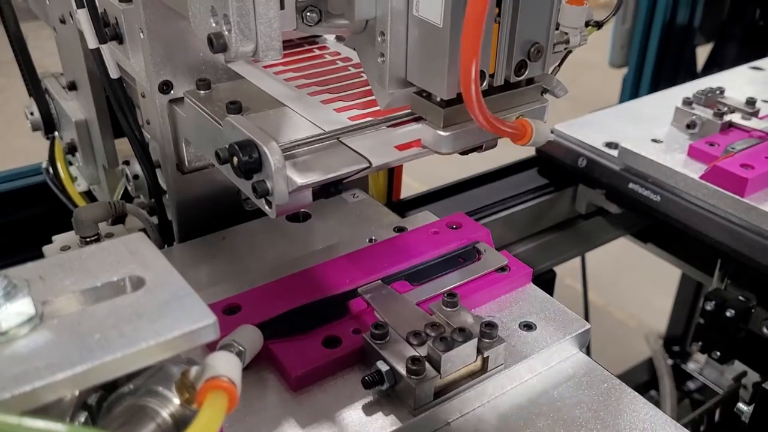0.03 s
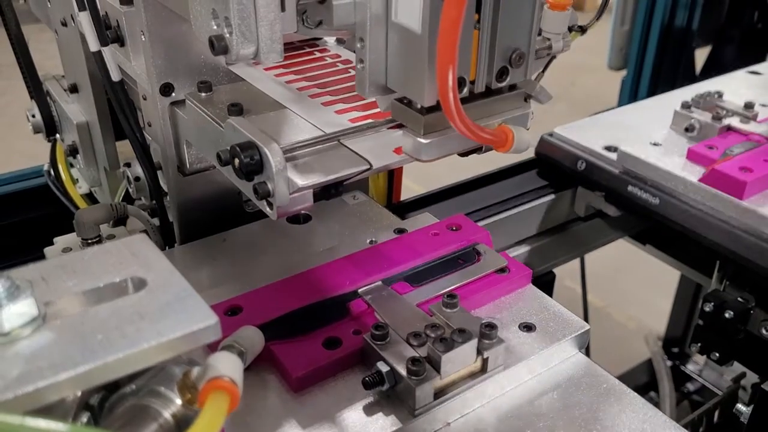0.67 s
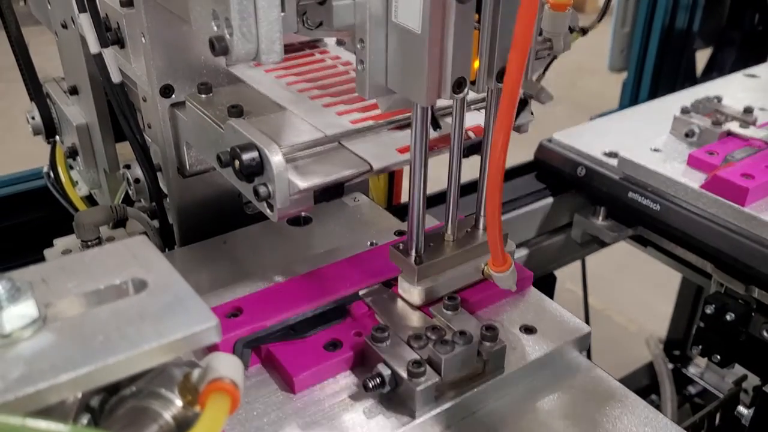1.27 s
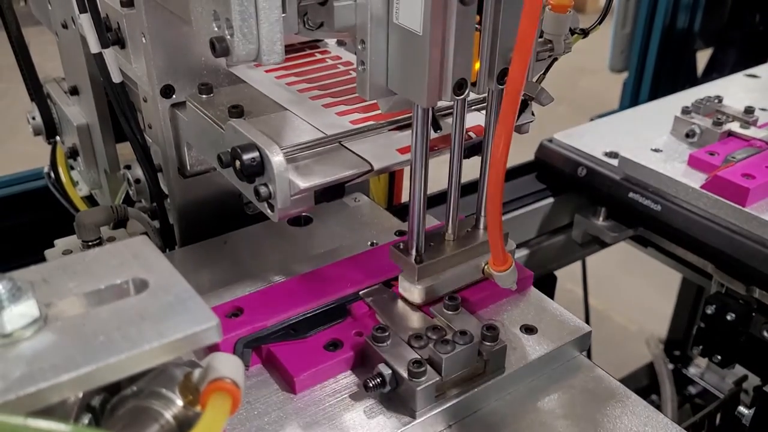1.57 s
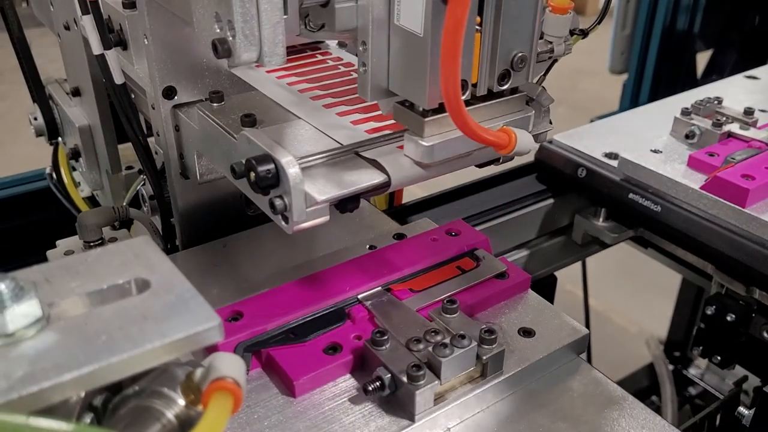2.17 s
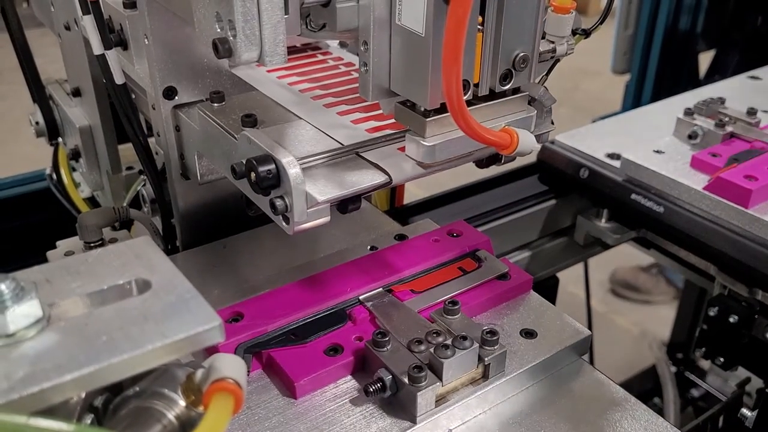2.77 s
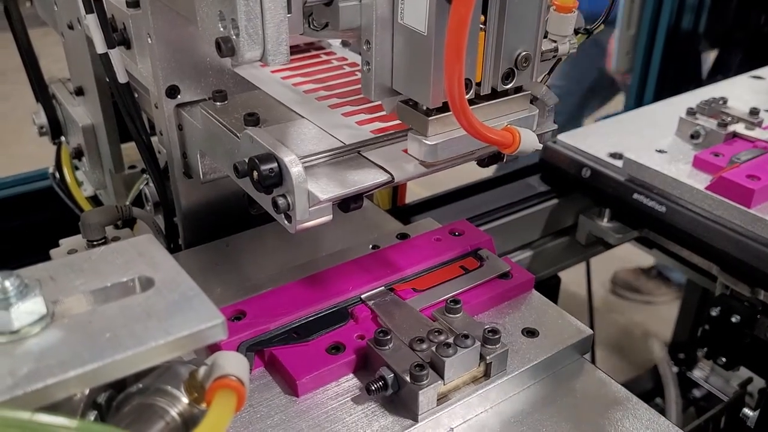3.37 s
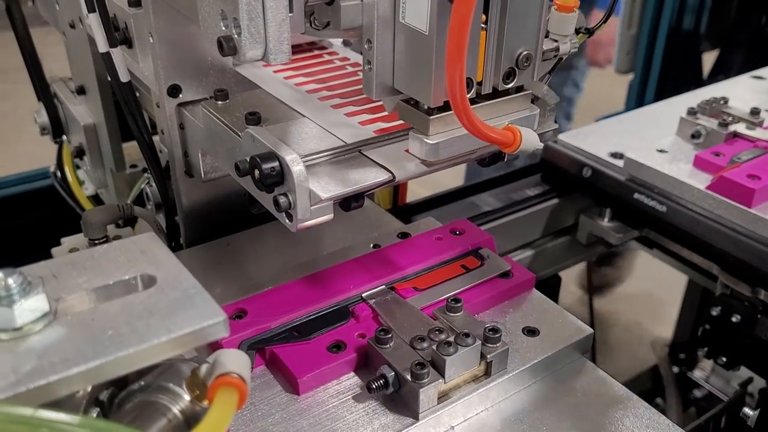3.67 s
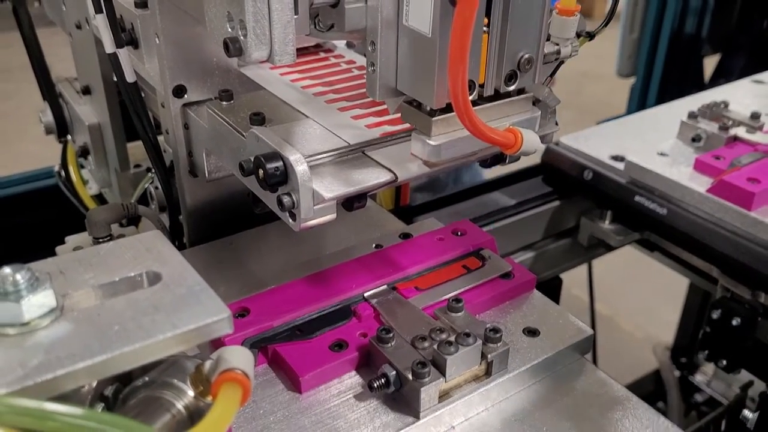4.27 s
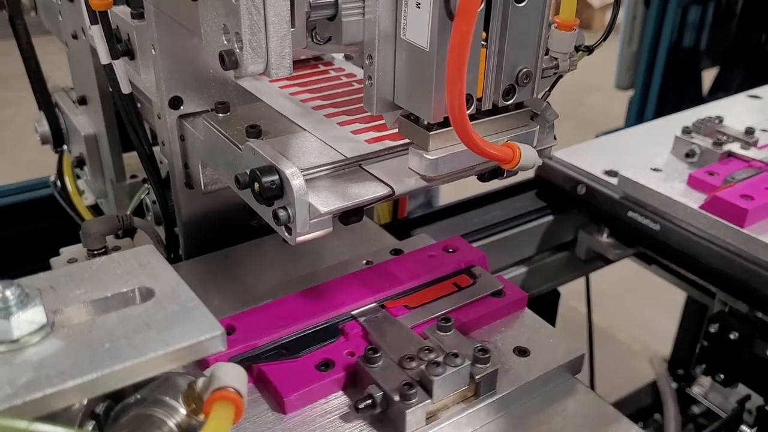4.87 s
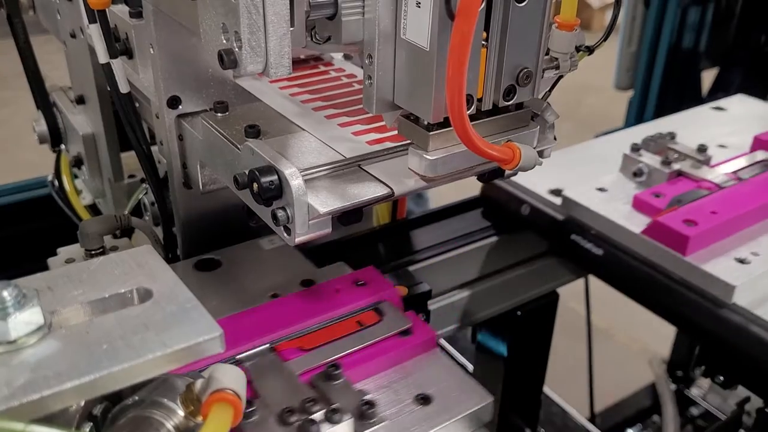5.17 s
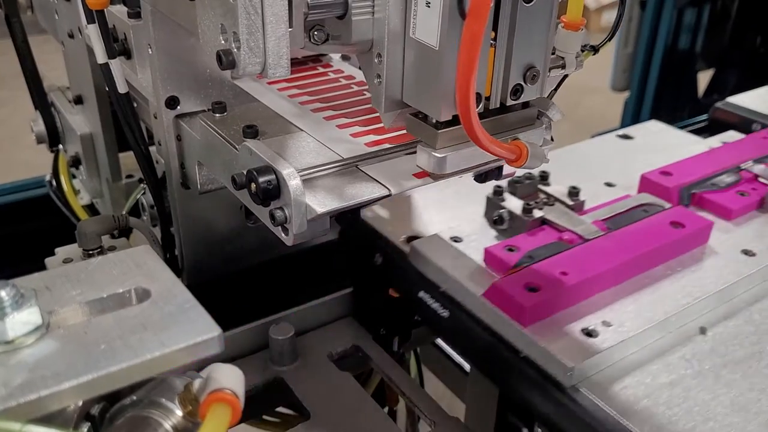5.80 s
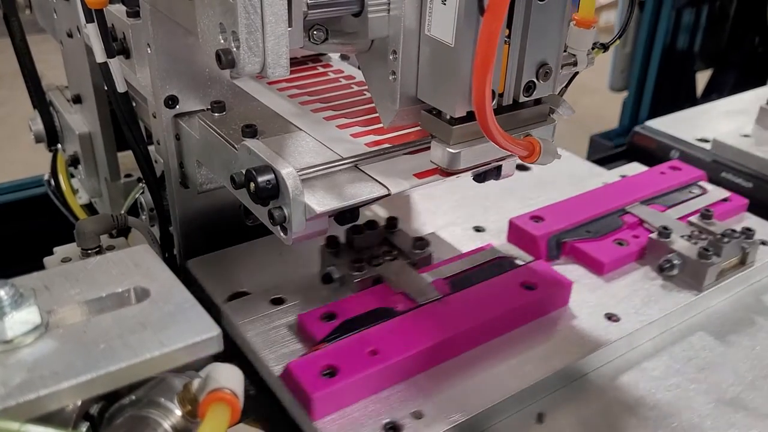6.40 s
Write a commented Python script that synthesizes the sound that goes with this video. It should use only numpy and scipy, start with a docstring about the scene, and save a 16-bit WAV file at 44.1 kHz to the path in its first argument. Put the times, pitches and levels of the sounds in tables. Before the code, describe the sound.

A pneumatic assembly machine runs close by, its leaking air hissing steadily over a low workshop drone. At first, valves puff sharply and slides knock against the metal frame as a cylinder moves down and up. Later a thin vent hisses and fades. Then a sharp clack releases a carriage, which rolls along a rail with a faint bearing whine, more clacks and a low thud.

```python
"""A pneumatic pick-and-place machine close by. Leaking air hisses among metal plates over a shop drone.
First 2.3 s: valves puff as a cylinder goes down and up, the suction head draws, slides knock on the frame.
The vacuum ejector blows from 0.6 to 4 s; at 3.6 s a thin vent opens and bleeds down.
At 4.9 s the carriage is released with a clack, starts with a low hum and rolls on, bearings singing.
More knocks and clacks follow; at 5.9 s it jolts the bed."""
import sys
import numpy as np
from scipy import signal
from scipy.fft import rfft, irfft, next_fast_len
from scipy.io import wavfile

SR = 44100
rng = np.random.default_rng(int(sys.argv[2]) if len(sys.argv) > 2 else 0)


def wav_out(sig):
    """Save sig, one row per channel (or a flat mono array), as 16-bit PCM at SR to the path in sys.argv[1]."""
    wavfile.write(sys.argv[1], SR, np.round(np.clip(np.atleast_2d(sig).T, -1, 1) * 32767).astype(np.int16))


N = 292824
TIME_S = np.arange(N) / SR

# likeness of the two microphones: freq_hz, coherence, left_lead_rad
MIC_COHERENCE = [(100, 1, 1), (440, 0.87, 0.68), (656, 0.43, -2), (865, 0.07, 2), (1160, 0.6, 1.5),
                 (1510, 0.2, 1.2), (1460, 0.46, -7), (2053, 0, -2), (2010, 0.44, -4.5), (2304, 0.3, 1),
                 (2730, 0.36, -3), (3900, 0.16, 0), (16000, 0, 1)]
# workshop drone: freq_hz, level_db
SHOP_SPECTRUM = [(20, -21), (65, -7), (95, -1), (150, 3), (195, -10), (240, 8.5), (330, 0), (450, -14),
                 (700, 4.5), (1500, -60)]
# electric machines nearby: pitch_hz, level_db
SHOP_HUM = [(60, -61), (120, -61.5), (266, -56.5)]
# trembling machine bed: freq_hz, level_db
BED_SPECTRUM = [(20, -38), (40, -7), (65, 3.5), (110, -3), (200, -6), (350, -1), (600, -10), (1200, -23)]
# steady leak: freq_hz, left_db, right_db
LEAK_SPECTRUM = [(202, -38, -50), (630, -16, -11.5), (905, -23, -15), (1250, -14, -8.5), (2180, -7.5, 2.5),
                 (2765, -5, -10.5), (3270, -13.5, -15.0), (4920, -10.5, -7), (6270, -17.5, -11.5),
                 (7810, -11.5, -9.5), (9030, -21.5, -20.5), (10930, -14, -10), (14000.0, -15, -8),
                 (15300, -11, -7.5)]
# standing waves between the plates: centre_hz, sigma_hz, left_db, right_db
PLATE_MODES = [(1013, 36, 14, -2.5), (1359, 28, -3, 8), (1666, 20, -13, -9), (1670, 16, -2, 4.5),
               (1764, 9.6, 7, 5), (1694, 13, 7, 1.5), (2124, 24, -14, -13), (2304, 35, 1, 4.5),
               (2490, 51, -9.5, 3), (2826, 24, -25, 6), (3470, 21, 5.2, 8), (4280, 77, 1.5, 3),
               (5860, 150, -1.5, 0), (6390, 47, 9, 6.5), (7900, 54, -11, 3), (8140, 50, -4, 0),
               (9000, 100, 0, 7.3), (9700, 110, -4, -1), (11865, 60, -6, -0.3), (12200, 35, 3, 2.5),
               (11500, 110, 1.5, -3), (12600, 110, 7, -4), (13394, 60, -0.9, -3), (14858, 60, -1.3, 6)]
# air drawn by the machine: time_s, flow_db
AIR_FLOW = [(0, -0.5), (.5, -1), (.7, 1.1), (1.5, 0.3), (1.9, 1.4), (2.7, 1.5), (3.3, 5), (3.55, 4.5),
            (3.97, 3), (4.1, 0.5), (5.03, 0.1), (5.17, 1.5), (6.64, 2.3)]
# thin vent: freq_hz, level_db
VENT_SPECTRUM = [(3000, -25), (7000, -8), (9500, -6), (12000, 4), (15500, 3)]
# exhaust jet: freq_hz, level_db
JET_SPECTRUM = [(1500, -68), (3000, 14.5), (4500, 11.5), (6000, 11.5), (7300, 13), (9500, 5), (12000, 6.5),
                (15500, -36)]
# valve puffs: start_s, level_db, rise_s, hold_s, decay_s, spit_re_jet_db,
# whistle_hz, whistle_re_jet_db, whistle_half_width_hz, pan_left_db
VALVE_PUFFS = [(0.089, -26, 0.0035, 0.018, 0.043, -10, 4250, 2, 260, -5),
               (0.539, -22, 0.0033, 0.028, 0.049, -6, 4340, -3, 210, -3),
               (0.849, -26, 0.017, 0.024, 0.079, 1, 12620, -2, 260, 5),
               (1.188, -31, 0.027, .035, 0.044, 5, 12600, 1, 260, 4),
               (1.513, -31.5, 0.018, 0.045, .06, -1, 5300, -5, 300, 6),
               (1.636, -21.5, 0.025, 0.033, 0.086, 1, 5300, -2, 140, 1)]
# carriage drive: time_s, effort_db
DRIVE_EFFORT = [(4.95, -22), (5.1, 4.5), (5.25, 4.5), (5.45, 3.5), (5.8, 4), (6.3, 4), (6.64, -1)]
# bearings on the rail: centre_hz, width_hz, level_db
RAIL_MODES = [(1916, 53, 3), (2218, 84, 3), (3865, 73, -3)]
# struck frame: freq_hz, level_db
FRAME_SPECTRUM = [(90, -26), (130, -40), (175, -3), (280, -0.5), (420, -4.5), (560, -5), (720, -5.5),
                  (950, -12.5), (1500, -31)]
# thud of the bed: freq_hz, level_db
THUD_SPECTRUM = [(25, -32), (55, 0), (80, -9.5), (140, 2.5), (200, -6.5), (400, -24)]
# loose parts: freq_hz, level_db
CLATTER_SPECTRUM = [(500, -25), (900, -5), (1500, -2.5), (2400, -13), (3300, -15.5), (6000, -18),
                    (12000, -25)]
# blows on the frame: start_s, body_db, ring_hz, thud_re_body_db, clatter_re_body_db, decay_s, rebound_ratio
FRAME_KNOCKS = [(0.092, -26, 250, -10, 2, 0.0091, 0), (0.214, -28.5, 371, -16, -26, 0.021, 0.2),
                (0.484, -38.5, 760, -16, 10, 0.019, 0.01), (0.731, -29, 374, -5, -10, 0.021, 0.02),
                (0.787, -29.5, 237, -6, 0, 0.021, 0.01), (0.803, -24, 402, -8, -1.5, .024, 0.4),
                (0.976, -30, 470, 1, 4, 0.017, 0.04), (1.113, -29.5, 400, -10, -3, 0.015, 0),
                (1.224, -29.5, 395.8, -22, -11, 0.032, 0.01), (1.353, -21, 229, -9, -1, 0.026, 0.49),
                (1.552, -27, 534, 3.5, -5, 0.013, 0.44), (1.602, -36, 243, -3, 10, 0.027, 0.05),
                (1.961, -22, 255, -2, -2.5, 0.023, 0.6), (2.085, -23, 180, 4.5, -11, .013, 0.02),
                (2.11, -27, 311.6, -10, 3, 0.016, 0.02), (2.13, -27.5, 190, -6, 3, 0.019, 0.5),
                (2.296, -24.5, 329, -9, 4, 0.02, 0.15), (3.497, -26.5, 217, -11, 0, 0.025, 0.25),
                (3.578, -25.5, 306, -7, 3, 0.011, 0), (3.797, -30, 340, -22, -4, 0.054, 0.04),
                (4.011, -31, 508, -6, 2, 0.032, 0), (4.575, -34, 423, -7, -11, 0.02, 0.04),
                (4.67, -35, 445, -25, 5, .018, 0.05), (4.881, -25, 397.6, -25, -2, 0.026, 0.56),
                (5.46, -24.5, 692, -14, -3.5, 0.017, 0.01), (5.82, -32, 302, -8, -8, 0.018, 0.03),
                (5.855, -32, 573.3, 4, -5, 0.021, 0.01), (5.894, -24.5, 174, 3, -2, 0.0089, 0.03),
                (6.012, -30, 571, -24, 3, 0.04, 0.7), (6.203, -30, 732, -6, -4, 0.014, 0),
                (6.584, -33, 290, -4, -5, 0.012, 0.01)]
# resonances of the end stops: centre_hz, width_hz, level_db
END_STOP_MODES = [(859, 80, -6.5), (1180, 100, -5.5), (1423, 73.5, -4), (1760, 170, -1), (1930, 140, -10),
                  (2200, 53, 3.5), (2510, 220, -12)]
# steel meeting an end stop: start_s, clack_db, decay_s, pitch_ratio, tick_db, pan_left_db
END_STOP_HITS = [(1.353, -17, 0.0085, 1.21, -34, 18), (4.9125, -12, 0.015, 1, -31, -7),
                 (4.924, -11, 0.0081, 0.96, -14.5, -3), (5.142, -20, 0.0056, 1.2, -46, -8),
                 (5.832, -16, 0.012, 0.91, -42, -7), (5.976, -27, 0.0059, 1.2, -42, -5),
                 (6.204, -14.5, 0.0075, 1.06, -36, -7), (6.234, -19, 0.01, 0.73, -49, -3)]

WORK_END_S, VENT_OPEN_S = 2.2, 3.578


def gain_of(db):
    """Decibels to a factor."""
    return 10 ** (np.asarray(db) / 20)


def unit_rms(x):
    """Scales to rms 1."""
    return x / np.sqrt(np.mean(x ** 2) + 1e-20)


def lookup(points, hz, column=1):
    """One table column along log frequency."""
    table = np.array(points, float)
    return np.interp(np.log(hz + 1), np.log(table[:, 0] + 1), table[:, column])


def band(points, hz):
    """Gain of a spectrum that falls away beyond its ends."""
    outside = np.maximum(points[0][0] / (hz + 1), 1) * np.maximum(hz / points[-1][0], 1)
    return gain_of(lookup(points, hz)) / outside ** 3


def peak(hz, centre_hz, width_hz):
    """Gain of one resonance."""
    return 1 / np.hypot(1, (hz ** 2 - centre_hz ** 2) / (width_hz * (hz + 1)))


def modes(table, hz, pitch_ratio=1):
    """Summed gain of steep resonances."""
    return sum(gain_of(db) * peak(hz, centre_hz * pitch_ratio, width_hz) ** 2
               for centre_hz, width_hz, db in table)


def pan(left_db):
    """Channel gains, left over right by left_db."""
    return unit_rms(gain_of([[left_db / 2], [-left_db / 2]]))


def noise(colour, size=N):
    """Partly coherent stereo noise, rms 1, shaped by colour(hz)."""
    length = next_fast_len(size)
    hz = np.fft.rfftfreq(length, 1 / SR)
    a, b, c, d = rng.standard_normal((4, len(hz)))
    left, diffuse = a + 1j * b, c + 1j * d
    coherence = np.clip(lookup(MIC_COHERENCE, hz), 0, 1)
    lead_rad = lookup(MIC_COHERENCE, hz, column=2)
    right = coherence * left * np.exp(-1j * lead_rad) + np.sqrt(1 - coherence ** 2) * diffuse
    return unit_rms(irfft(np.array([left, right]) * colour(hz), length)[:, :size])


def tuned_noise(centre_hz, width_hz, size=N):
    """Noise through one steep resonance."""
    return noise(lambda hz: peak(hz, centre_hz, width_hz) ** 2, size)


def waver(rate_hz):
    """Slow random drift, rms 1."""
    hz = np.fft.rfftfreq(N, 1 / SR)
    return unit_rms(irfft(rfft(rng.standard_normal(N)) / (1 + (hz / rate_hz) ** 2), N))


def add(mix, start_s, sound):
    """Mixes a sound in at start_s."""
    part = mix[:, max(round(start_s * SR), 0):][:, :sound.shape[1]]
    part += sound[:, :part.shape[1]]


def burst(colour, rise_s, decay_s, room_db, room_decay_s, size=12000):
    """Crowded modes struck at once: quick rise, decay, weak room tail."""
    t = np.arange(size) / SR
    tail = gain_of(room_db) * np.exp(-t / room_decay_s)
    envelope = (1 - np.exp(-t / rise_s)) * np.hypot(np.exp(-t / decay_s), tail)
    return unit_rms(noise(colour, size) * envelope) * np.sqrt(np.mean(envelope ** 2))


def reflections(strength, count=8):
    """Gain spectrum at each microphone with echoes of a few milliseconds."""
    taps = np.zeros((2, 4096))
    taps[:, 0] = 1
    delay_samples = rng.integers(60, 330, (2, count))
    np.put_along_axis(taps, delay_samples, strength * rng.choice([-1, 1], (2, count)), 1)
    fine_bins, tap_bins = np.fft.rfftfreq(N), np.fft.rfftfreq(taps.shape[1])
    return np.array([np.interp(fine_bins, tap_bins, unit_rms(abs(rfft(side)))) for side in taps])


def drive_effort():
    """Effort of the carriage drive, as a factor."""
    return gain_of(np.interp(TIME_S, *np.transpose(DRIVE_EFFORT), left=-90))


def bed_shake(rest_db=-55, work_db=-44.5, drive_db=-52, tremble_re_knock_db=-17, decay_s=0.14):
    """Envelope of the bed: shaken by head and carriage, trembling after each knock."""
    power = gain_of(rest_db) ** 2 + gain_of(work_db) ** 2 * (TIME_S < WORK_END_S)
    power += (gain_of(drive_db) * drive_effort()) ** 2
    for start_s, db, *_ in FRAME_KNOCKS:
        after = TIME_S >= start_s
        tremble = gain_of(db + tremble_re_knock_db) * np.exp((start_s - TIME_S[after]) / decay_s)
        power[after] += tremble ** 2
    return np.sqrt(power)


def rumble(drone_db=-49, drift_hz=1.5, flutter_db=2.2):
    """The trembling bed; drone and hum of other machinery."""
    shake = bed_shake() * gain_of(flutter_db * waver(rate_hz=5.3))
    hum = np.zeros(N)
    for pitch_hz, db in SHOP_HUM:
        phase_rad = 2 * np.pi * np.cumsum(pitch_hz + drift_hz * waver(rate_hz=5.9)) / SR
        hum += gain_of(db) * np.sqrt(2) * np.sin(phase_rad)
    bed = shake * noise(lambda hz: band(BED_SPECTRUM, hz))
    drone = gain_of(drone_db) * noise(lambda hz: band(SHOP_SPECTRUM, hz))
    return bed + drone + hum


def leak_colour(hz, low_cut_hz=250):
    """Broad leak spectrum times the standing waves between the plates."""
    db = np.array([lookup(LEAK_SPECTRUM, hz), lookup(LEAK_SPECTRUM, hz, column=2)])
    for centre_hz, sigma_hz, left_db, right_db in PLATE_MODES:
        db += np.outer([left_db, right_db], np.exp(-0.5 * ((hz - centre_hz) / sigma_hz) ** 2))
    return gain_of(db) * hz / np.hypot(hz, low_cut_hz)


def air_leak(base_db=-20, flicker_db=0.6, flutter_db=0.5, whoosh_hz=3100, fizz_hz=9200):
    """Leaking air follows the flow; its muffled part flutters with turbulence."""
    hz = np.fft.rfftfreq(N, 1 / SR)
    spectrum = rfft(noise(leak_colour))
    low = 1 / (1 + (hz / whoosh_hz) ** 8)
    high = 1 - 1 / (1 + (hz / fizz_hz) ** 8)
    mid = 1 - low - high
    comb = reflections(strength=0.145)  # small parts mirror only the treble
    whoosh, hiss, fizz = (irfft(spectrum * share, N) for share in (low, mid * comb, high * comb))
    flow_db = np.interp(TIME_S, *np.transpose(AIR_FLOW))
    whoosh *= gain_of(0.33 + 0.57 * flow_db + flutter_db * waver(rate_hz=32))
    hiss *= gain_of(flow_db)
    fizz *= gain_of(-2.2 + 0.91 * flow_db + 2 * (TIME_S > VENT_OPEN_S))  # brighter once the vent opens
    return gain_of(base_db + flicker_db * waver(rate_hz=35)) * (whoosh + hiss + fizz)


def ejector(start_s=0.58, stop_s=4.02, open_s=0.03, close_s=0.043, roar_db=-33, sing_db=-40):
    """The vacuum ejector blows while the head holds its part; its outlet sings faintly."""
    valve = np.clip((TIME_S - start_s) / open_s, 0, 1) * np.clip((stop_s - TIME_S) / close_s, 0, 1)
    roar = tuned_noise(centre_hz=2680, width_hz=520) * pan(left_db=3.5)
    sing = tuned_noise(centre_hz=5520, width_hz=86) * pan(left_db=-16)
    return valve * (gain_of(roar_db) * roar + gain_of(sing_db) * sing)


def suction(start_s=0.62, stop_s=1.57, ramp_s=0.14, level_db=-29):
    """Air rushes through the suction head as it carries a part down."""
    valve = np.clip(np.minimum(TIME_S - start_s, stop_s - TIME_S) / ramp_s, 0, 1)
    return gain_of(level_db) * valve * tuned_noise(centre_hz=2200, width_hz=520) * pan(left_db=-3.5)


def vent(level_db=-20, rise_s=0.006, decay_s=0.24):
    """A thin vent snaps open and bleeds down."""
    t = np.maximum(TIME_S - VENT_OPEN_S, 0)
    pressure = np.minimum(t / rise_s, 1) * np.exp(-t / decay_s)
    return gain_of(level_db) * pressure * noise(lambda hz: band(VENT_SPECTRUM, hz)) * pan(left_db=-4)


def valves(whistle_life_ratio=0.84, size=22000):
    """Each valve dumps a cylinder: a jet with fine spit; the port whistle dies sooner."""
    out, t = np.zeros((2, N)), np.arange(size) / SR
    for (start_s, db, rise_s, hold_s, decay_s, spit_db,
         whistle_hz, whistle_db, half_width_hz, left_db) in VALVE_PUFFS:
        pressure = np.minimum(t / rise_s, 1) * np.exp(-np.maximum(t - rise_s - hold_s, 0) / decay_s)
        jet = noise(lambda hz: band(JET_SPECTRUM, hz), size)
        spit = gain_of(spit_db) * tuned_noise(centre_hz=15000, width_hz=4300, size=size)
        whistle = gain_of(whistle_db) * tuned_noise(whistle_hz, 2 * half_width_hz, size)
        puff = pressure * (jet + spit) + pressure ** (1 / whistle_life_ratio) * whistle
        add(out, start_s, gain_of(db) * puff * pan(left_db))
    return out


def carriage(hum_db=-47, roll_db=-45, whine_db=-34, hum_hz=102, pull_peak_s=5.2, pull_width_s=0.17):
    """The drive hums as it gets under way; the bearings roll and sing along the rail."""
    pull = np.exp(-((TIME_S - pull_peak_s) / pull_width_s) ** 2)
    hum = pull * np.sin(2 * np.pi * np.cumsum(hum_hz + 2 * waver(rate_hz=14)) / SR)
    roll = tuned_noise(centre_hz=632, width_hz=200) * pan(left_db=-3)
    whine = noise(lambda hz: modes(RAIL_MODES, hz)) * pan(left_db=-6)
    return drive_effort() * (gain_of(hum_db) * hum + gain_of(roll_db) * roll + gain_of(whine_db) * whine)


def jolt(start_s=5.891, gain_db=-10, rock_hz=72, rise_s=0.005, decay_s=0.011):
    """The moving carriage jolts the bed, which rocks for a cycle or two."""
    t = np.maximum(TIME_S - start_s, 0)
    envelope = (1 - np.exp(-t / rise_s)) * np.exp(-t / decay_s)
    return gain_of(gain_db) * envelope * np.sin(2 * np.pi * rock_hz * t)


def blow(ring_hz, thud_db, clatter_db, decay_s):
    """One blow shakes the frame, rings the struck part, thumps the bed and rattles loose parts."""
    body = burst(lambda hz: band(FRAME_SPECTRUM, hz),
                 rise_s=0.0022, decay_s=decay_s, room_db=-17.5, room_decay_s=0.072)
    thud = burst(lambda hz: band(THUD_SPECTRUM, hz),
                 rise_s=0.0025, decay_s=0.65 * decay_s, room_db=-20, room_decay_s=0.099)
    clatter = burst(lambda hz: band(CLATTER_SPECTRUM, hz),
                    rise_s=0.00034, decay_s=decay_s, room_db=-18, room_decay_s=0.077) * pan(left_db=-3.5)
    t = np.arange(body.shape[1]) / SR
    ring_envelope = (1 - np.exp(-2 * t * ring_hz)) * np.exp(-t / (0.96 * decay_s))
    ring = np.sqrt(2) * np.sin(2 * np.pi * ring_hz * t) * ring_envelope
    ring_db = -6 - 0.25 * clatter_db  # a clean blow rings more
    return body + gain_of(ring_db) * ring + gain_of(thud_db) * thud + gain_of(clatter_db) * clatter


def jiggles(rate_hz=6, max_db=-41, spread_db=5, ring_range_hz=(170, 420)):
    """Small parts knock faintly at random while the head works."""
    out = np.zeros((2, N))
    slots_s = np.arange(0, WORK_END_S, 1 / rate_hz)
    for slot_s, (lateness, weakness, pitch) in zip(slots_s, rng.random((len(slots_s), 3))):
        sound = blow(np.interp(pitch, (0, 1), ring_range_hz), thud_db=-1, clatter_db=3, decay_s=0.017)
        add(out, slot_s + lateness / rate_hz, gain_of(max_db - spread_db * weakness) * sound)
    return out


def knocks(gain_db=2.5, landings=3, rebound_s=0.031, dulling_db=1, pitch_ratio=0.95):
    """Slides and fixtures hit the frame; some bounce, each landing weaker, duller and lower."""
    out = np.zeros((2, N))
    for start_s, db, ring_hz, thud_db, clatter_db, decay_s, rebound_ratio in FRAME_KNOCKS:
        for k in range(landings if rebound_ratio > 0 else 1):
            sound = blow(ring_hz * pitch_ratio ** k, thud_db, clatter_db - k * dulling_db, decay_s)
            add(out, start_s + k * rebound_s, gain_of(db + gain_db) * rebound_ratio ** k * sound)
    return out


def end_stops(clack_gain_db=3):
    """Steel chatters against an end stop: a dry clack with a bright tick."""
    out = np.zeros((2, N))
    for start_s, clack_db, decay_s, pitch_ratio, tick_db, left_db in END_STOP_HITS:
        clack = burst(lambda hz: modes(END_STOP_MODES, hz, pitch_ratio),
                      rise_s=0.001, decay_s=decay_s, room_db=-20, room_decay_s=0.03)
        tick = burst(lambda hz: peak(hz, centre_hz=5595, width_hz=780),
                     rise_s=0.00026, decay_s=0.0036, room_db=-39, room_decay_s=0.025)
        hit = gain_of(clack_db + clack_gain_db) * clack + gain_of(tick_db) * tick
        add(out, start_s, hit * pan(left_db))
    return out


def scene():
    """Pneumatics, mechanics and rumble, summed."""
    pneumatics = air_leak() + ejector() + suction() + valves() + vent()
    mechanics = knocks() + jiggles() + end_stops() + carriage() + jolt()
    return pneumatics + mechanics + rumble()


def record(dry):
    """Soft clip of the tallest peaks, then a low-pass."""
    ceiling, cutoff_hz = 0.9, 15760
    rounded = dry / (1 + (dry / ceiling) ** 6) ** (1 / 6)
    low_pass = signal.firwin(1023, cutoff_hz, window=("kaiser", 9), fs=SR)
    return signal.oaconvolve(rounded, low_pass[None], "same")


dry = scene()
out = record(dry)
wav_out(out)
```